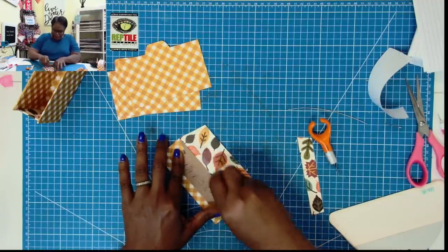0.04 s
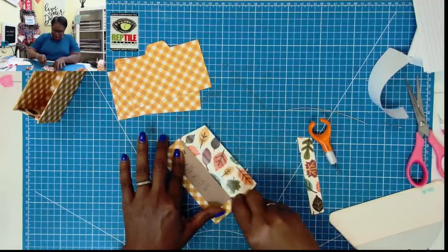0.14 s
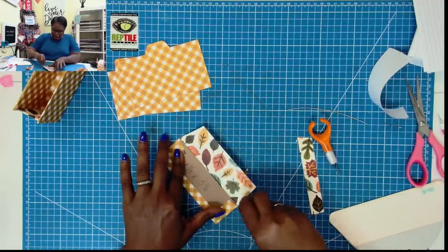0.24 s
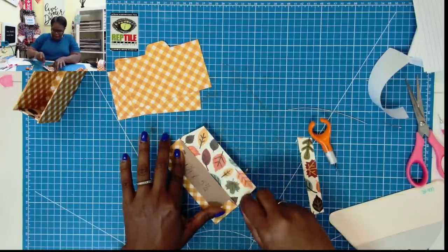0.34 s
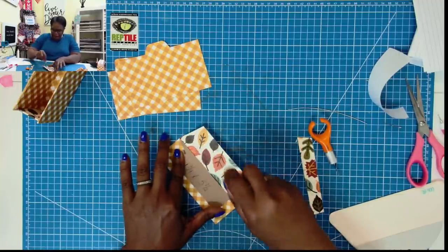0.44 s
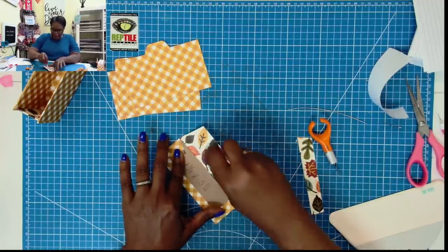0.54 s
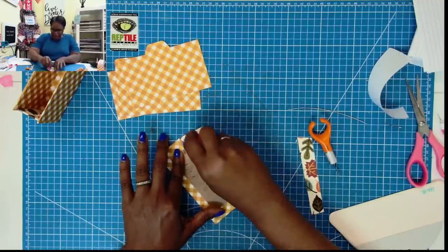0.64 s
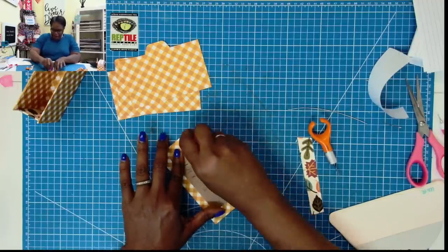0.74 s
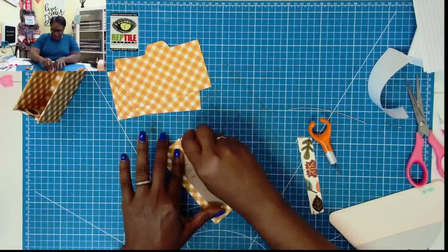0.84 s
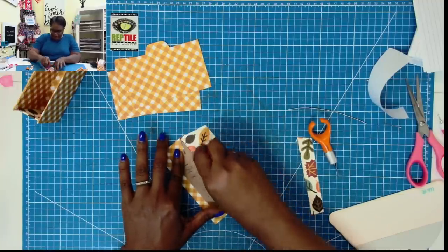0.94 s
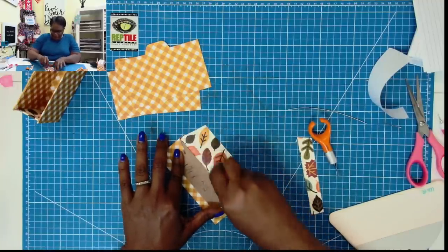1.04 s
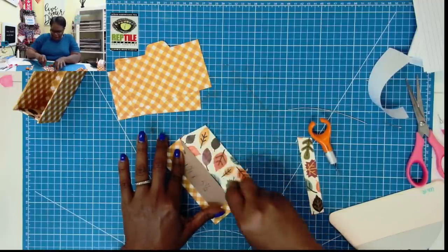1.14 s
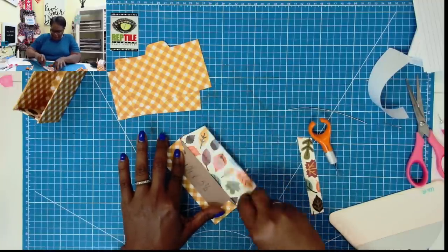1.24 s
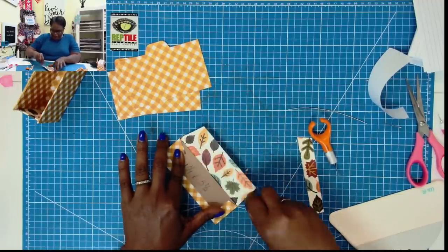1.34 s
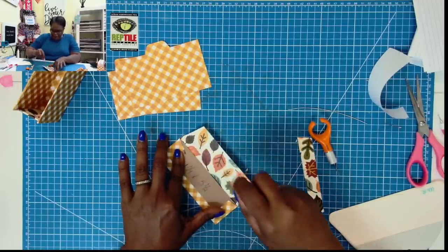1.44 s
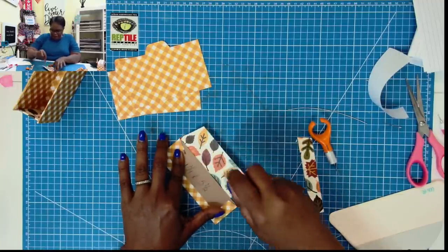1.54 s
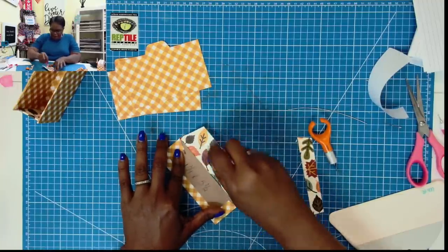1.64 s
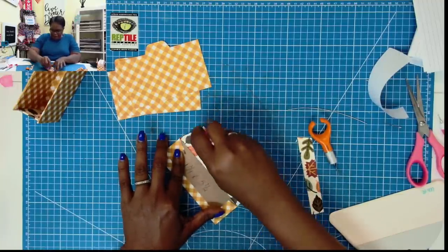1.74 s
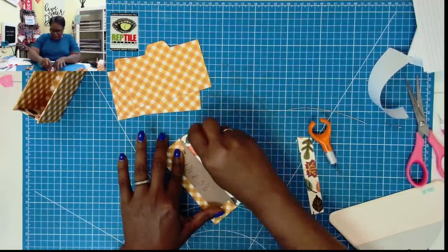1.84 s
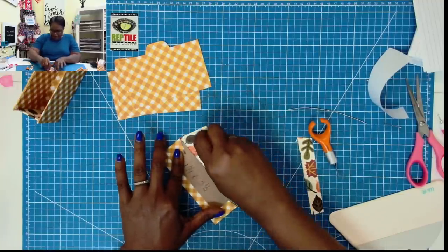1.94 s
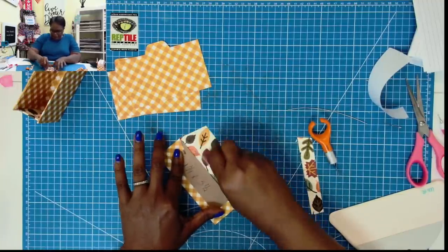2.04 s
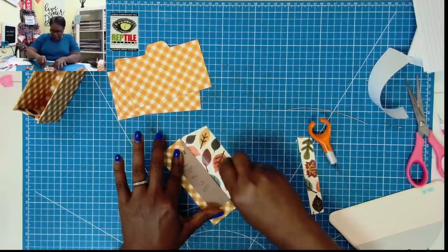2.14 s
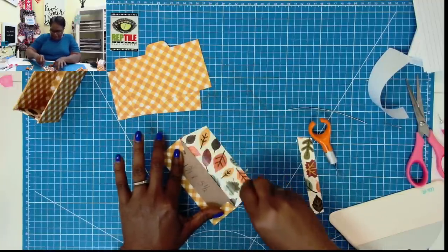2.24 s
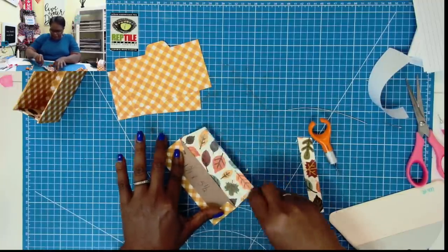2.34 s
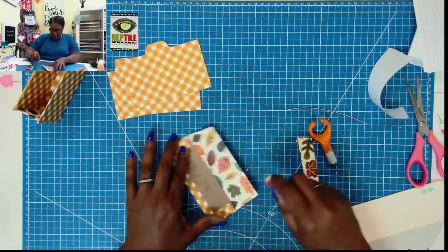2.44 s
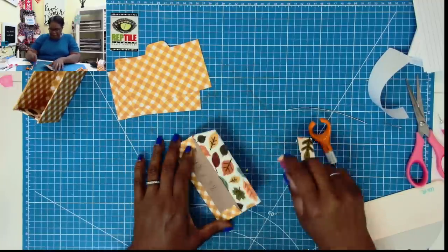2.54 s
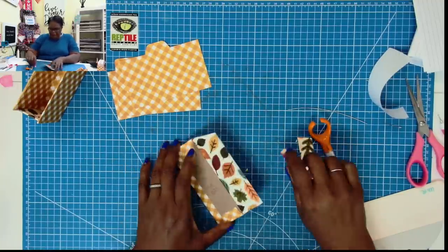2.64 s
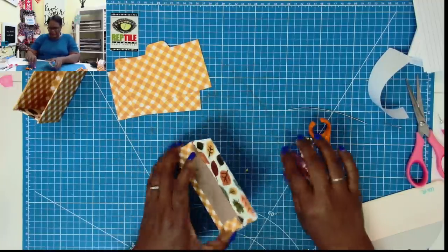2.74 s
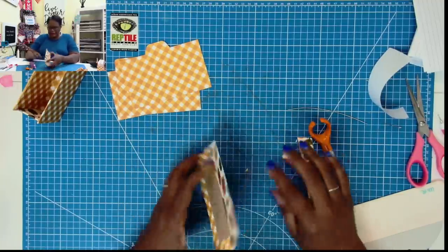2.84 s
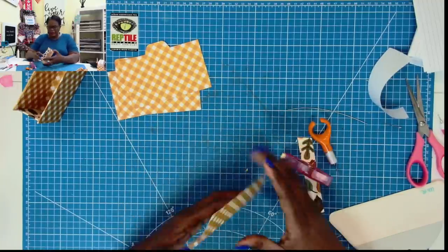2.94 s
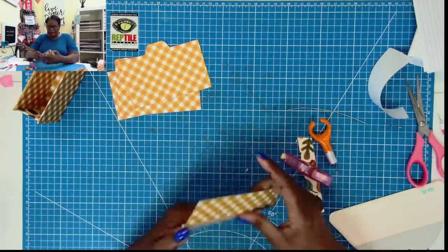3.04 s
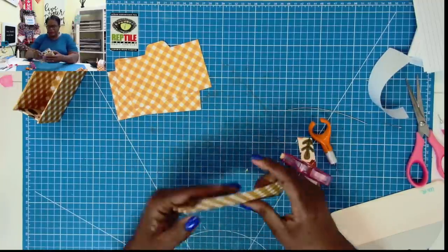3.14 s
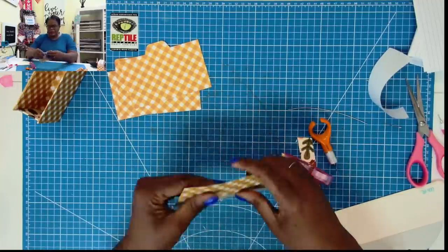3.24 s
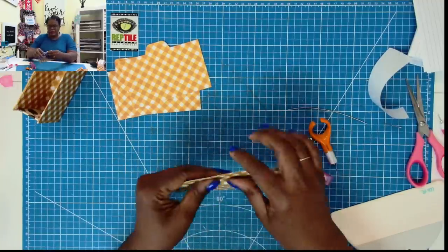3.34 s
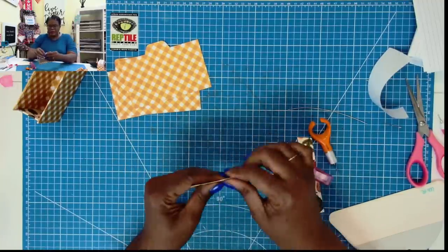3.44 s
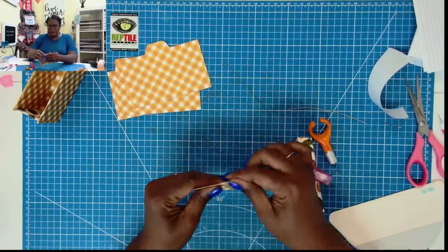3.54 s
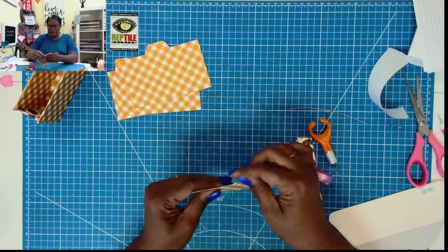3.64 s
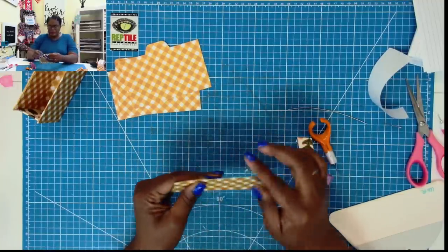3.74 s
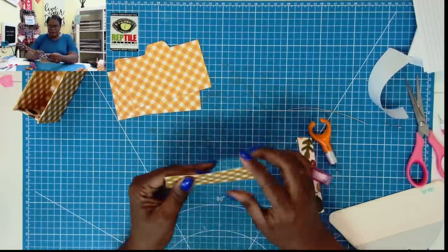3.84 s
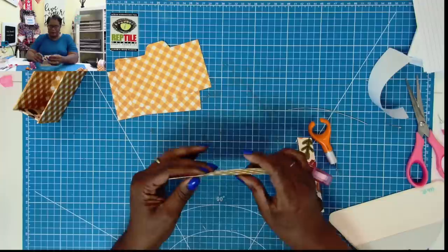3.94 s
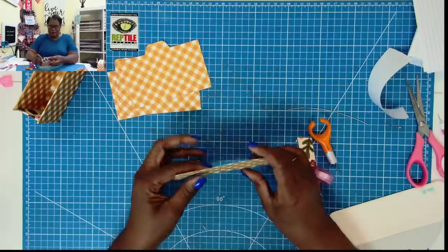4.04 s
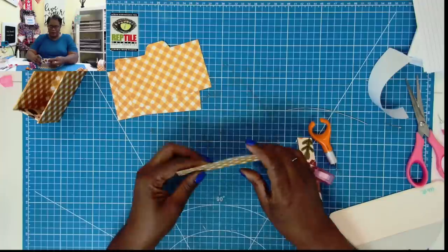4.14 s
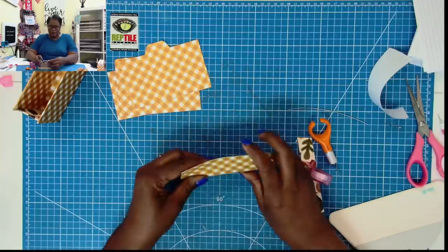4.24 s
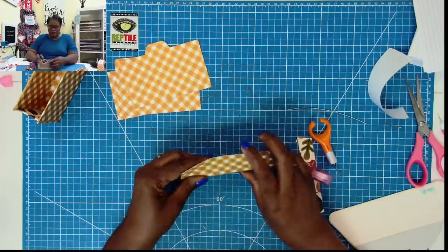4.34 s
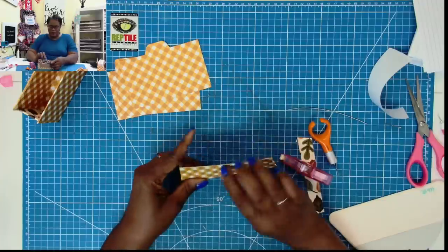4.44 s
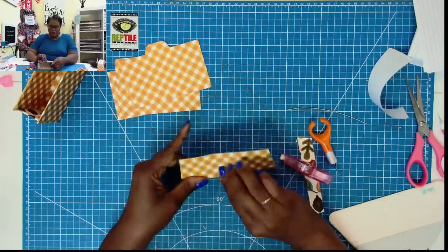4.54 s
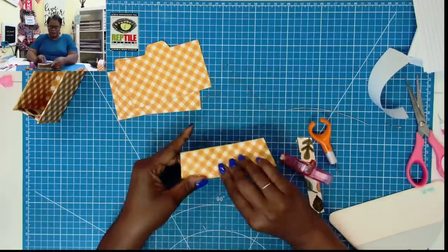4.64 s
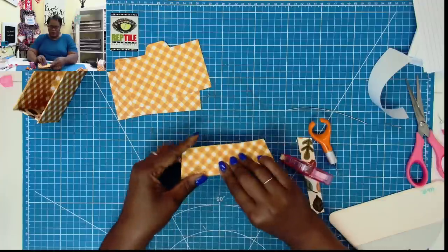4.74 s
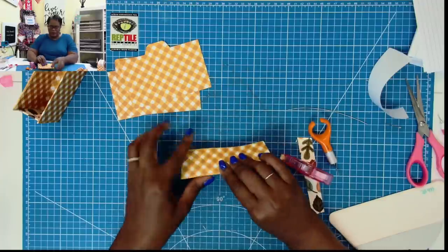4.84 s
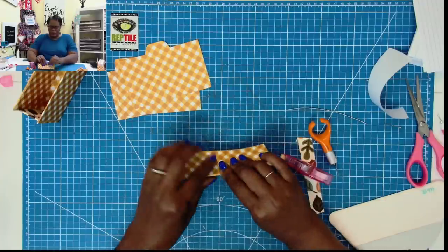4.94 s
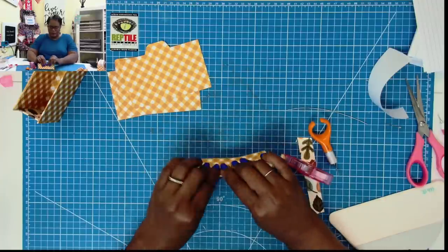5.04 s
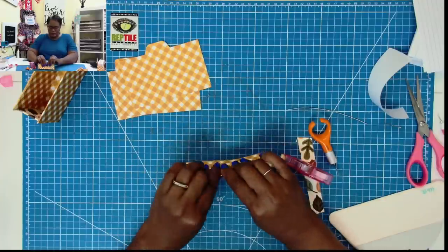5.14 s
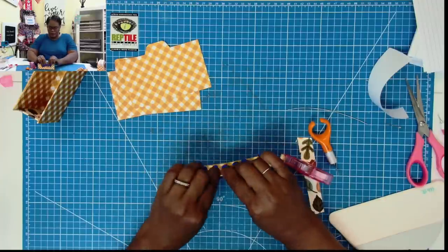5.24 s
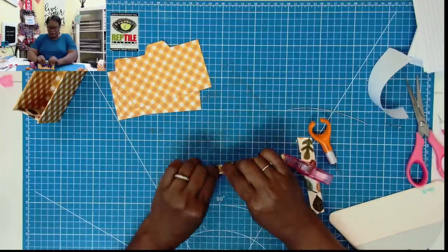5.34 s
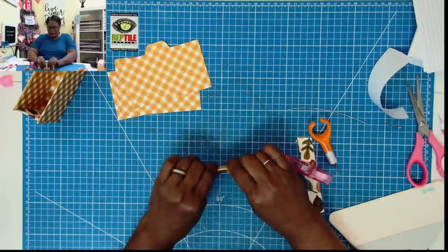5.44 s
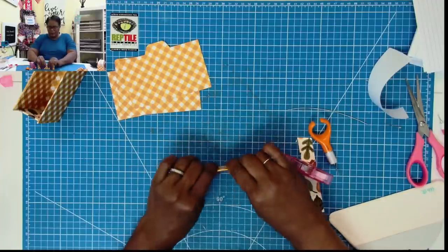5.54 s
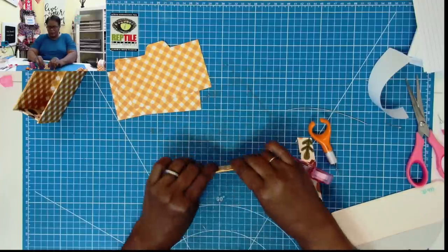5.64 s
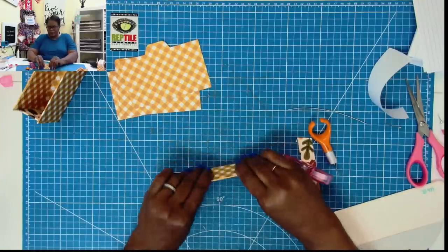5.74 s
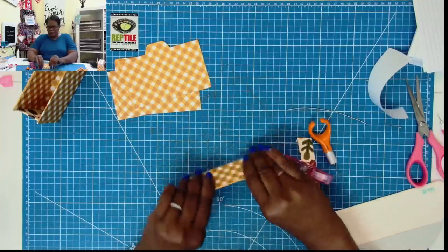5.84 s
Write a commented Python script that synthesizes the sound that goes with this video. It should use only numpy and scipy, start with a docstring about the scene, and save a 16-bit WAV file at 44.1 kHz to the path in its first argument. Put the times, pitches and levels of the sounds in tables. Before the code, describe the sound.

Close stereo microphones at a craft table catch three gritty, zipping adhesive strokes, the first cut very short, with surging pressure, spool clicks and crisp breaks. Dull knocks come between them. The hard plastic runner is set down with a clack and brief rattle, followed by irregular card snaps, dry rustles, fingertip hiss and quiet fold rubbing, over low rumble and a very short room tail.

```python
"""A tape runner rasps three times along a card flap: gears ratchet, glue tears, the spool ticks and squeaks, the tape
snaps off. The runner clacks down on a table; the card is flexed with snaps and rustles, and its fold is rubbed.
Grains of noise, shaped in spectrum and envelope, make the rasp and rustle; short scattered pushes into resonances
and body responses make the ticks, cracks, knocks and snaps; unsteady tones make the squeaks.
A short diffuse room tail and a low hum surround it all."""
import sys
import numpy as np
from scipy import signal
from scipy.fft import rfft, irfft, next_fast_len
from scipy.io import wavfile
from scipy.ndimage import uniform_filter1d, map_coordinates

SR = 44100
rng = np.random.default_rng(int(sys.argv[2]) if len(sys.argv) > 2 else 0)


def log_audio(samples):
    """Write samples as a 16-bit WAV file to the path given in sys.argv[1]."""
    # one column per channel
    frames = np.atleast_2d(samples).T
    # limit to full scale, then quantise
    limited = np.clip(frames, -1, 1)
    pcm = np.round(limited * 32767).astype(np.int16)
    wavfile.write(sys.argv[1], SR, pcm)


N = 259293
TIME = np.arange(N) / SR
BRIEF = TIME[:SR // 3]

# rel_db: level before later gains or normalising
# room noise: freq_hz, rel_db
ROOM_NOISE_SPECTRUM = [(11, -10.5), (18, -5.5), (53, -11), (139, -21), (239, -28), (355, -25.5), (529, -33),
                       (1050, -36), (1280, -37.5), (1800, -38), (3450, -41), (10700, -44.5), (16000, -47)]
# runner on the card: start_s, end_s, case_rel_db
STROKES = [(0.0, 0.07, -43.5), (.692, 1.104, -46), (1.749, 2.146, -45)]
# hand bearing down: middle_s, half_length_s, extra_db
SURGES = [(0.022, 0.044, 5), (0.754, 0.06, 8.5), (0.924, 0.046, 11.5), (1.81, .04, 8), (1.88, .03, 9),
          (2.008, 0.031, 10), (2.07, 0.037, 9)]
# scraping runner case: freq_hz, rel_db
SCRAPE_SPECTRUM = [(150, -5), (250, -2), (461, -7), (626, 0.5), (873, -4), (1530, 9), (2100, 3), (2460, 10),
                   (2770, 3.5), (3050, 8), (3970, 9.5), (6000, -4), (7800, -28), (13200, -120)]
# tearing glue: freq_hz, rel_db
GLUE_SPECTRUM = [(3240, -19), (5500, 3), (5930, -2), (7190, 8), (7760, 1.5), (8600, 9), (10800, -3.5),
                 (14200, 1.5), (16000, -8)]
# spool catches: start_s, rel_db
SPOOL_CATCHES = [(0.0064, -21.5), (0.7901, -21.5), (0.9477, -25), (0.9762, -23.5), (1.7525, -31),
                 (1.921, -39), (1.9865, -18), (2.0867, -24), (2.176, -31.5)]
# spool wheel resonances: freq_hz, width_hz, rel_db
WHEEL_MODES = [(4000, 500, -13), (6130, 6700, -13.5), (8420, 580, -2.5)]
# tape breaks: start_s, rel_db
TAPE_BREAKS = [(.0751, -4.5), (1.1033, -4), (2.1495, -2)]
# plastic case resonances: freq_hz, width_hz, rel_db
CASE_MODES = [(1300, 290, -36), (3900, 300, 0.5), (5090, 630, 2), (8040, 2000, 1)]
# case nose on the card: freq_hz, width_hz, rel_db
NOSE_MODES = [(587, 1500, -1), (1220, 330, 1)]
# blows on the table: start_s, rel_db, hardness_hz
TABLE_BLOWS = [(0.597, -32.5, 257), (.987, -37, 500), (1.679, -28, 230), (2.5418, -13, 9000),
               (2.58, -24.5, 1090), (2.851, -34, 795), (5.033, -42.5, 500), (5.257, -32.5, 200)]
# table top modes: freq_hz, rel_db, t60_s
TABLE_MODES = [(72.4, -2.5, 0.28), (114.1, -2.5, 0.28), (270.7, -9.5, 0.32), (353, -19, 0.78),
               (400, -6, 0.33), (582, -1, 0.26), (809, -1.5, 0.23), (952, -2.5, 0.22), (1065, -1, 0.2),
               (1290, -1, 0.11), (2080, -21, 0.16)]
# table thud response: freq_hz, rel_db
THUD_RESPONSE = [(50, -25), (115, -1.5), (190, 0), (400, 3), (800, -1), (1200, -.5), (1850, -10.5),
                 (2450, -7), (4500, -20.5), (9000, -13.5), (15000, -34)]
# spool squeaks, later fingertips on the card: middle_s, length_s, pitch_hz, rel_db
SQUEAKS = [(.754, .026, 7300, -34.5), (.772, 0.076, 1425, -43), (.769, 0.02, 2280, -36),
           (.813, .022, 2470, -29.5), (.91, 0.054, 1580, -38.5), (.947, .032, 2950, -37.5),
           (1.812, 0.045, 1473, -42.5), (1.855, .03, 7360, -37), (1.881, .04, 1497, -37.5),
           (2.005, 0.066, 1580, -37.5), (2.018, .04, 3300, -34), (2.08, .04, 4020, -35),
           (2.874, 0.051, 4760, -50.5), (3.401, .12, 2710, -54.5)]
# card snaps: start_s, level_db, crisp_edge_rel_db, low_flap_rel_db (both relative to level_db)
CARD_SNAPS = [(2.358, -36.5, -12, -16), (2.69, -36.5, -5, -7), (2.912, -42.5, 7, -18),
              (3.131, -34.5, 4, -5.5), (3.136, -29, -6, -9), (3.168, -30, -7.5, -5), (3.457, -43.5, 6, 3),
              (3.478, -39, -0.5, -1), (3.759, -33, -3, -3), (3.864, -22, -2.5, 4), (3.991, -23.5, -2, 0),
              (4.199, -24, 3, -0.5), (4.242, -38.5, -19, 3), (4.307, -31.5, -9.5, -6.5),
              (4.418, -38, -10, -6.5), (4.477, -33, -5, -11.5), (4.598, -25, -0.5, -18),
              (4.607, -19, -17, -8), (4.631, -16.5, -11.5, -23), (4.66, -33, -5, -14),
              (4.846, -41, -9, -18), (5.034, -51, 3, -9), (5.21, -43, -9, 8), (5.238, -44, -10, 3),
              (5.256, -32.5, -11, 4.5), (5.297, -29.5, -11.5, -1), (5.445, -39, -16, -2),
              (5.75, -56, 11.5, -7)]
# card response: freq_hz, rel_db
CARD_RESPONSE = [(90, -6), (200, -7), (320, 6), (500, 3), (720, 1), (1100, 6), (1700, 7), (2400, 6),
                 (3800, -10), (5500, -17.5), (8000, -11.5), (11000, -23), (16000, -26.5)]
# flap, body and crisp edge of a snap: low_hz, high_hz
CARD_BANDS = [(150, 850), (900, 3600), (4000, 15000)]
# finger slides: fastest_s, rise_s, rustle_rel_db, hiss_rel_db
SWIPES = [(2.296, 0.011, -66, -56), (2.863, 0.041, -47.5, -49.5), (3.085, .015, -51, -55),
          (3.155, 0.02, -38, -48), (3.28, 0.049, -55.5, -58), (3.39, 0.044, -61.5, -58),
          (3.477, 0.043, -49, -49), (3.755, 0.0097, -43, -48), (3.83, .04, -53, -54.5),
          (4.235, .014, -44, -51), (4.306, 0.0046, -41, -51), (4.343, 0.01, -44, -44.5),
          (4.543, 0.0087, -49.5, -50.5), (4.646, 0.016, -39, -46), (5.171, 0.018, -54, -49.5),
          (5.27, 0.027, -55, -46), (5.453, 0.028, -50, -51), (5.56, 0.072, -54, -55.5),
          (5.737, 0.015, -77, -43.5), (5.838, .012, -47, -64), (5.865, .018, -46, -65)]
# rustling sheet: freq_hz, rel_db
SHEET_SPECTRUM = [(180, -18), (300, -23), (432, 14.5), (760, -1), (1190, 2.5), (3680, -6.5), (4600, -10),
                  (5000, -15), (6500, -58), (11000, -120)]
# hissing skin: freq_hz, rel_db
SKIN_SPECTRUM = [(2350, -10.5), (4000, -1), (9220, 5.5), (10500, -7.5), (12500, 0), (16000, -13)]
# fold rubbed on the table: firmest_s, rise_s, rel_db
FOLD_RUBS = [(5.181, 0.033, -41), (5.295, 0.039, -42), (5.461, 0.034, -43.5), (5.536, 0.076, -47)]
# juddering fold: freq_hz, rel_db
JUDDER_SPECTRUM = [(26, -38), (45, -7), (113, 4.5), (200, -6), (284, 1), (388, -2), (669, -21),
                   (1000, -14.5), (1300, -15), (2200, -120)]
# case landing on the table: freq_hz, rel_db
CLATTER_RESPONSE = [(130, -8), (280, 5), (550, 5), (720, 0), (950, 6), (1400, 2), (1900, -14), (2350, -7.5),
                    (4000, -11), (8000, -12.5), (15000, -23)]
# room decay: freq_hz, t60_s
ROOM_DECAY = [(100, .25), (300, .19), (800, .18), (2000, .15), (5000, .14), (13000, .12)]
# capsule balance: freq_hz, right_over_left_db
RIGHT_OVER_LEFT = [(100, 1.5), (1000, 1.4), (4000, 0.6), (12000, 0.44)]

ROOM_NOISE_DB = -49.8
GLUE_DB, GLUE_DB_PER_SURGE_DB = -43.5, 0.43
TEETH_START_HZ, TEETH_TOP_HZ, SPEED_UP_S = 130.7, 318.3, .12  # time constant, anew each stroke
BUCKLE_S = 0.0013  # time for a giving panel to peak
SWIPE_RELEASE, RUB_RELEASE = 1.73, 1.8  # ratio of release to rise
CRINKLES_PER_S = 110
SET_DOWN_S, SET_DOWN_DB = 2.5415, -15
TOP_HZ = 16100


def amp(db):
    """Decibels to gain."""
    return 10 ** (np.asarray(db) / 20)


def unit(x):
    """x at rms 1."""
    return x / np.sqrt(np.mean(x ** 2) + 1e-20)


def unit_peak(x):
    """x with its loudest 3 ms (132 samples) at rms 1."""
    return x / np.sqrt(uniform_filter1d(x ** 2, size=132, mode="constant").max() + 1e-20)


def along(points, hz):
    """(Hz, value) points interpolated on a log frequency axis."""
    f, v = np.transpose(points)
    return np.interp(np.log(hz + 1), np.log(f + 1), v)


def wobble(rate_hz, size=N):
    """A smooth random curve with rate_hz knots a second."""
    knots = rng.standard_normal(int(size * rate_hz / SR) + 4)
    return map_coordinates(knots, [np.arange(size) * rate_hz / SR])


def swell(s, rise_s, release=1):
    """A smooth gesture peaking at s; its fall takes release times its rise."""
    return np.exp(-((TIME - s) / np.where(TIME < s, rise_s, rise_s * release)) ** 2)


def filtered(x, response):
    """x times a response of frequency."""
    m = next_fast_len(x.shape[-1] + 8192)
    return irfft(rfft(x, m) * response(np.fft.rfftfreq(m, 1 / SR)), m)[..., :x.shape[-1]]


def low_pass(hz, corner_hz):
    """First-order low-pass response."""
    return 1 / (1 + 1j * hz / corner_hz)


def high_pass(hz, corner_hz):
    """First-order high-pass response."""
    return 1j * hz / (corner_hz + 1j * hz)


def coloured(x, spectrum):
    """x with its spectrum weighted by the table, at rms 1."""
    return unit(filtered(x, lambda hz: amp(along(spectrum, hz))))


def ringing(table, size=4096):
    """Causal impulse response of a body with the table's level at each frequency."""
    level_db = along(table, np.fft.rfftfreq(size, 1 / SR))
    cepstrum = irfft(np.log(amp(level_db) + 1e-6))
    cepstrum[1:size // 2] *= 2  # fold to minimum phase
    cepstrum[size // 2 + 1:] = 0
    return irfft(np.exp(rfft(cepstrum)))


def resonate(x, modes):
    """x through parallel resonances that fall off steeply above their pitch."""
    def response(hz):
        total = 0
        for centre_hz, width_hz, db in modes:
            damping = 1j * hz * width_hz
            band = damping / (centre_hz ** 2 - hz ** 2 + damping)
            total = total + amp(db) * band * low_pass(hz, centre_hz)
        return total
    return filtered(x, response)


def contact(t60_s, scatter):
    """One sharp push, then a decaying scatter of smaller ones."""
    push = rng.standard_normal(len(BRIEF)) * amp(-60 * BRIEF / t60_s)
    push *= scatter / np.linalg.norm(push)
    push[0] = 1
    return push


def grains(per_s, spread_db):
    """Tiny slips of random size and sign at random moments, at rms 1."""
    size = amp(spread_db * np.minimum(rng.exponential(size=N), 4))
    return unit((rng.random(N) < per_s / SR) * size * rng.choice([-1, 1], N))


def crackle(envelope, spread_db):
    """Fibres or loose parts slip in a cluster of uneven sizes."""
    size = amp(spread_db * rng.standard_normal(len(envelope)))
    return envelope * size * rng.standard_normal(len(envelope))


def patchy(x, depth_db):
    """Narrow bands swell and fade in turn, as the grip on a ringing body shifts."""
    z = signal.stft(x, nperseg=256)[2]
    smoothing = np.outer(np.hanning(5), np.hanning(15))
    field = signal.fftconvolve(rng.standard_normal(z.shape), smoothing, "same")
    return signal.istft(z * amp(depth_db * unit(field)), nperseg=256)[1][:N]


def add(track, s, sound):
    """Mix a sound into the track from time s."""
    start = max(round(s * SR), 0)
    track[start:start + len(sound)] += sound[:N - start]


def background(hum_hz=120.0, hum_db=-64):
    """Room rumble and faint hiss as shaped noise; a hum wavers in phase and level."""
    hum = unit(np.sin(2 * np.pi * hum_hz * TIME + .5 * wobble(15)) * amp(3.2 * wobble(10)))
    noise = coloured(rng.standard_normal(N), ROOM_NOISE_SPECTRUM)
    return amp(ROOM_NOISE_DB) * noise + amp(hum_db) * hum


def runner(tooth_decay=0.76, smooth_share=0.3, rasp_db=-.5):
    """Each gear tooth jerks the tape on and glue threads tear in a burst; a firmer hand makes both louder."""
    down, rasp, rate_hz = np.zeros(N), np.zeros(N), np.zeros(N)
    for start, end, db in STROKES:
        on = (TIME >= start) & (TIME < end)
        down[on], rasp[on] = 1, amp(db)
        lag = np.exp((start - TIME[on]) / SPEED_UP_S)
        rate_hz[on] = TEETH_TOP_HZ + (TEETH_START_HZ - TEETH_TOP_HZ) * lag
    surge_db = sum(db * swell(s, half_s) for s, half_s, db in SURGES)

    teeth = np.cumsum(np.maximum(rate_hz, TEETH_START_HZ) * amp(.5 * wobble(60))) / SR
    strength = amp(0.95 * rng.standard_normal(N))[teeth.astype(int)]
    jerks = unit(smooth_share + strength * np.exp(-(teeth % 1) / tooth_decay))  # decay in tooth periods

    scrape = coloured(patchy(jerks * grains(11000, 4.2), depth_db=4.5), SCRAPE_SPECTRUM)
    tearing = coloured(patchy(jerks * grains(15000, 6.0), depth_db=3.0), GLUE_SPECTRUM)
    case = uniform_filter1d(rasp, size=256) * scrape
    glue = uniform_filter1d(down, size=256) * tearing
    return amp(rasp_db + surge_db) * case + amp(GLUE_DB + GLUE_DB_PER_SURGE_DB * surge_db) * glue


def spool_ticks(catch_db=-6.0):
    """The spool catches: a scattered push excites the wheel's resonances."""
    out = np.zeros(N)
    for s, db in SPOOL_CATCHES:
        tick = resonate(contact(t60_s=0.017, scatter=1.0), WHEEL_MODES)
        add(out, s, amp(db + catch_db) * unit_peak(tick))
    return out


def tape_breaks(case_db=-21.5, dry_db=-21.5, dry_hz=2500, drag_db=-41, drag_s=0.01):
    """Breaking tape cracks directly and through the case, whose nose drags off the card."""
    out = np.zeros(N)
    dragging = BRIEF / drag_s * np.exp(1 - BRIEF / drag_s)
    for s, db in TAPE_BREAKS:
        crack = contact(t60_s=0.0036, scatter=0.68)
        dry_crack = filtered(crack, lambda hz: high_pass(hz, dry_hz) * low_pass(hz, 6000))
        drag = resonate(crackle(dragging ** 2, spread_db=-2.0), NOSE_MODES)
        add(out, s, amp(db + case_db) * unit_peak(resonate(crack, CASE_MODES)))
        add(out, s, amp(db + dry_db) * unit_peak(dry_crack))
        add(out, s, amp(drag_db) * unit_peak(drag))
    return out


def table_knocks(ring_db=-15, level_db=-0.5):
    """A thud with the table top ringing; softer blows excite less treble."""
    out = np.zeros(N)
    thud = ringing(THUD_RESPONSE)
    for s, db, hardness_hz in TABLE_BLOWS:
        ring = np.zeros(len(BRIEF))
        for hz, mode_db, t60_s in TABLE_MODES:
            decay = amp(mode_db + rng.uniform(-0.52, 0.67) - 60 * BRIEF / t60_s)
            ring += decay * np.sin(2 * np.pi * (hz * BRIEF + rng.random()))
        blow = signal.fftconvolve(contact(t60_s=0.022, scatter=1.08), thud)[:len(BRIEF)]
        sound = unit_peak(blow) + amp(ring_db) * unit_peak(ring)
        sound = filtered(sound, lambda hz: low_pass(hz, hardness_hz) ** 2)
        add(out, s, amp(db + level_db) * unit_peak(sound))
    return out


def squeaks(waver=0.036, overtone_db=-16, level_db=-1):
    """The spool on its axle, or skin on the card, sticks and slips in short, unsteady tones."""
    out = np.zeros(N)
    for s, length_s, pitch_hz, db in SQUEAKS:
        envelope = np.sin(np.pi * np.minimum(BRIEF / length_s, 1))
        phase = 2 * np.pi * np.cumsum(pitch_hz * (1 + waver * wobble(401, size=len(BRIEF)))) / SR
        flutter = amp(2.1 * wobble(305, size=len(BRIEF)))
        tone = unit(flutter * (np.sin(phase) + amp(overtone_db) * np.sin(2 * phase)))
        add(out, s - length_s / 2, amp(db + level_db) * envelope * tone)
    return out


def card_snaps(after_db=-15, after_t60_s=0.06, pop=0.6, scuff_db=-13, scuff_rise_s=0.11):
    """Bent card scuffs, pops through and settles: wide panels flap low, edges click high."""
    out = np.zeros(N)
    card = ringing(CARD_RESPONSE)
    bands = [signal.butter(3, band, "bandpass", fs=SR, output="sos") for band in CARD_BANDS]
    giving = BRIEF / BUCKLE_S * np.exp(1 - BRIEF / BUCKLE_S)
    settling = amp(after_db - 60 * BRIEF / after_t60_s)
    bending = amp(-60 * BRIEF[::-1] / scuff_rise_s)  # rises 60 dB in scuff_rise_s
    for s, db, crisp_db, flap_db in CARD_SNAPS:
        slips = crackle(giving + settling, spread_db=4.0)
        slips[np.argmax(giving)] += pop * np.linalg.norm(slips)
        buckle = signal.fftconvolve(slips, card)
        for band, band_db in zip(bands, [flap_db, 0, crisp_db]):
            add(out, s, amp(db + band_db) * unit_peak(signal.sosfilt(band, buckle)))
        scuff = signal.fftconvolve(np.diff(crackle(bending, spread_db=10.0)), card)
        add(out, s - len(BRIEF) / SR, amp(db + crisp_db + scuff_db) * unit_peak(scuff))
    return out


def finger_slides(rustle_db=-3.5, hiss_db=-2.5, crinkle_db=-5):
    """Skin slips over the card in fine grains under a varying grip; small creases let go."""
    rustle = sum(amp(db) * swell(s, rise_s, SWIPE_RELEASE) for s, rise_s, db, _ in SWIPES)
    hiss = sum(amp(db) * swell(s, rise_s, SWIPE_RELEASE) for s, rise_s, _, db in SWIPES)
    grip = unit(amp(4.2 * wobble(90)))
    sliding = amp(rustle_db) * rustle * coloured(grains(2000, 4.3), SHEET_SPECTRUM)
    sliding += amp(hiss_db) * hiss * coloured(grains(8700, 4.6), SKIN_SPECTRUM)
    creases = unit(signal.oaconvolve(grains(CRINKLES_PER_S, 3.2), ringing(CARD_RESPONSE))[:N])
    return grip * sliding + amp(crinkle_db) * rustle * creases


def set_down(rattle_db=-12, rattle_t60_s=0.19, rattle_hz=800):
    """The plastic case clacks on the table and its loose parts rattle briefly."""
    out = np.zeros(N)
    shell = ringing(CLATTER_RESPONSE)
    clack = signal.fftconvolve(contact(t60_s=0.02, scatter=1.9), shell)
    rattle = signal.fftconvolve(crackle(amp(-60 * BRIEF / rattle_t60_s), spread_db=5.5), shell)
    rattle = filtered(rattle, lambda hz: low_pass(hz, rattle_hz))
    add(out, SET_DOWN_S, amp(SET_DOWN_DB) * (unit_peak(clack) + amp(rattle_db) * unit_peak(rattle)))
    return out


def fold_rubs(rub_db=0.5, split_db=-6, splits_per_s=45):
    """The pressed fold judders into the table and its fibres split."""
    pressing = sum(amp(db) * swell(s, rise_s, RUB_RELEASE) for s, rise_s, db in FOLD_RUBS)
    judder = coloured(grains(500, 3.7), JUDDER_SPECTRUM)
    splits = signal.oaconvolve(grains(splits_per_s, 1.4), ringing(CARD_RESPONSE))[:N]
    splits = unit(filtered(splits, lambda hz: low_pass(hz, 700)))
    return pressing * (amp(rub_db) * judder + amp(split_db) * splits)


def room(x, tail_db=-5.5, wall_db=-23.5, wall_delay_s=0.0099, build_s=0.0017):
    """A short diffuse tail, crossfaded between random patterns over time, plus one scattered reflection."""
    out = np.zeros(N)
    centres = np.linspace(0, N / SR, num=13)
    for centre in centres:
        hz, t, z = signal.stft(rng.standard_normal(len(BRIEF)), SR, nperseg=256)
        decay = amp(-60 * t / along(ROOM_DECAY, hz)[:, None])
        tail = signal.istft(z * decay, SR, nperseg=256)[1][:len(BRIEF)]
        tail *= 1 - np.exp(-BRIEF / build_s)
        tail /= np.linalg.norm(tail)
        share = np.maximum(1 - np.abs(TIME - centre) / centres[1], 0)
        near = np.flatnonzero(share)
        add(out, near[0] / SR, amp(tail_db) * signal.fftconvolve((x * share)[near], tail))
    reflection = signal.oaconvolve(x, contact(t60_s=0.0038, scatter=0.71)[:256])
    add(out, wall_delay_s, amp(wall_db) * reflection)
    return out


def scene(apart_db=-23.0, apart_hz=2500, self_noise_db=-26):
    """Two close capsules hear nearly the same sound, with a frequency-dependent level balance."""
    work = runner() + spool_ticks() + tape_breaks() + table_knocks() + squeaks()
    work += card_snaps() + finger_slides() + set_down() + fold_rubs()
    mid = work + room(work) + background()
    side = filtered(mid, lambda hz: np.tanh(along(RIGHT_OVER_LEFT, hz) * np.log(10) / 40))
    # echoes, mostly their treble, and background differ slightly between capsules
    echoes = filtered(room(work), lambda hz: high_pass(hz, apart_hz))
    side += amp(apart_db) * echoes + amp(self_noise_db) * background()
    return np.array([mid - side, mid + side])


def record(dry):
    """The recorder keeps nothing above its band limit."""
    return filtered(dry, lambda hz: hz < TOP_HZ)


dry = scene()
out = record(dry)
log_audio(out)
```